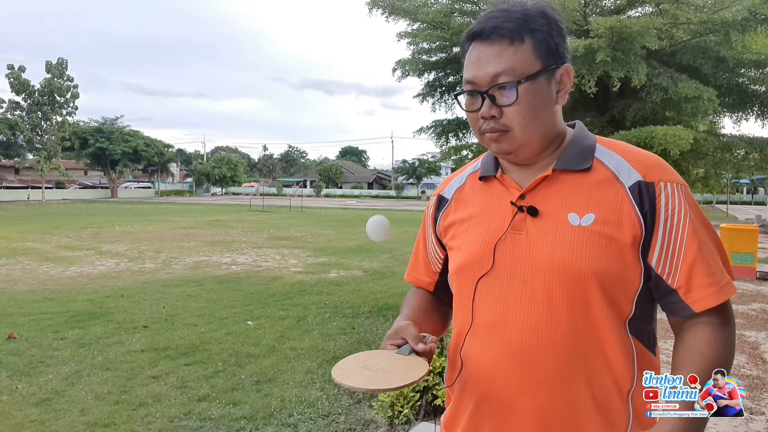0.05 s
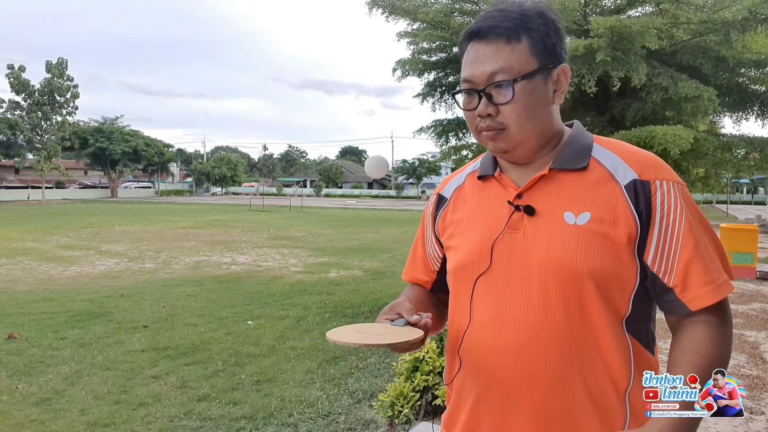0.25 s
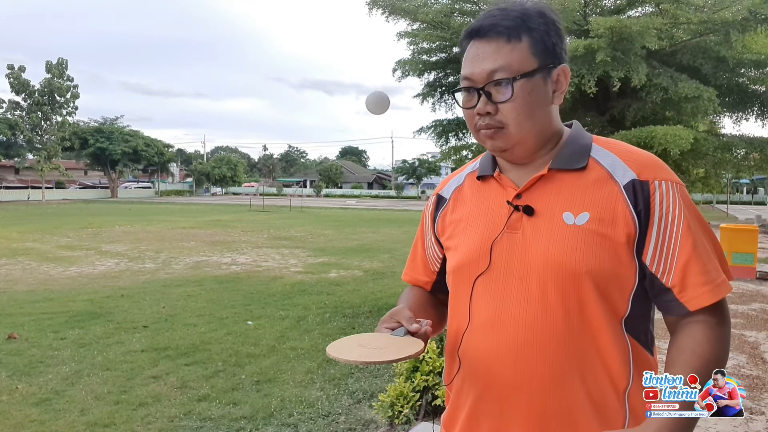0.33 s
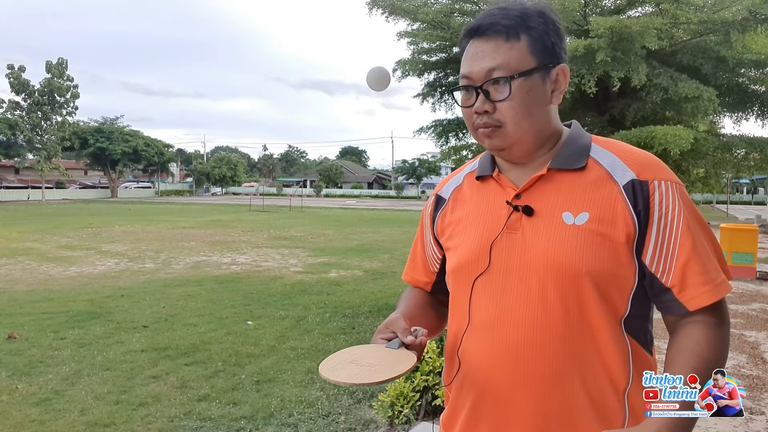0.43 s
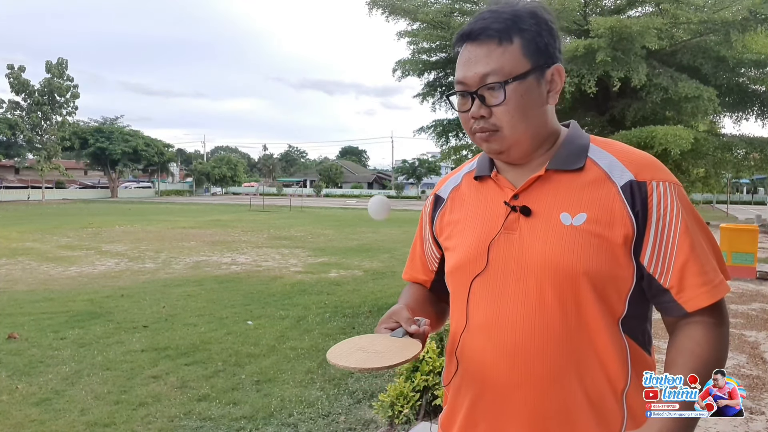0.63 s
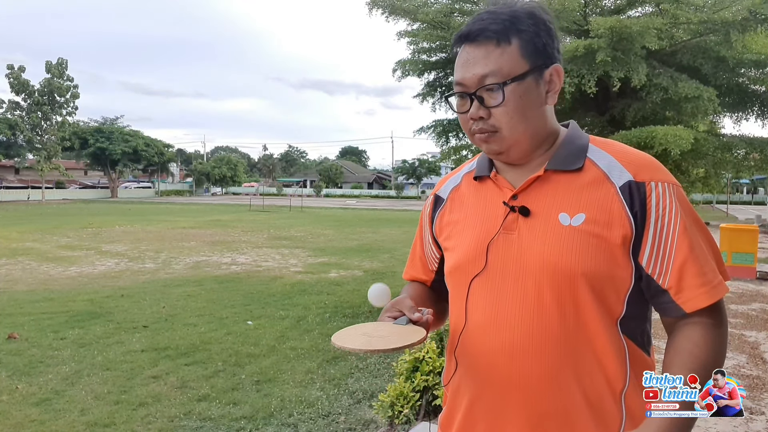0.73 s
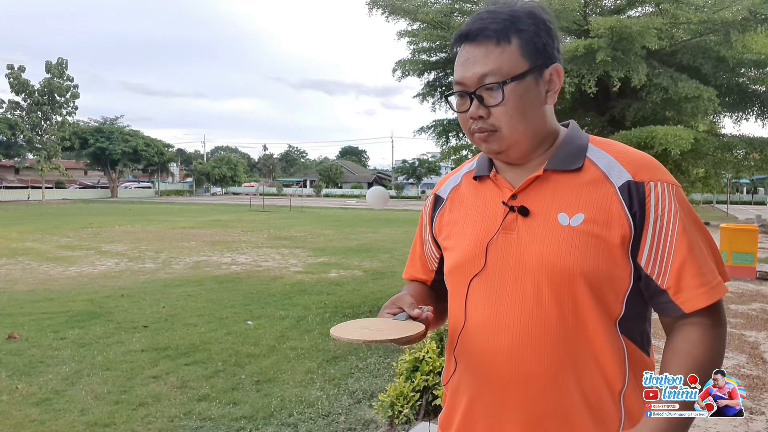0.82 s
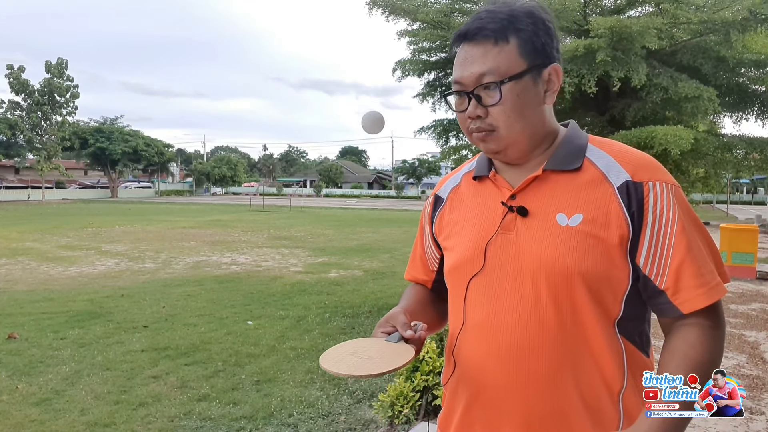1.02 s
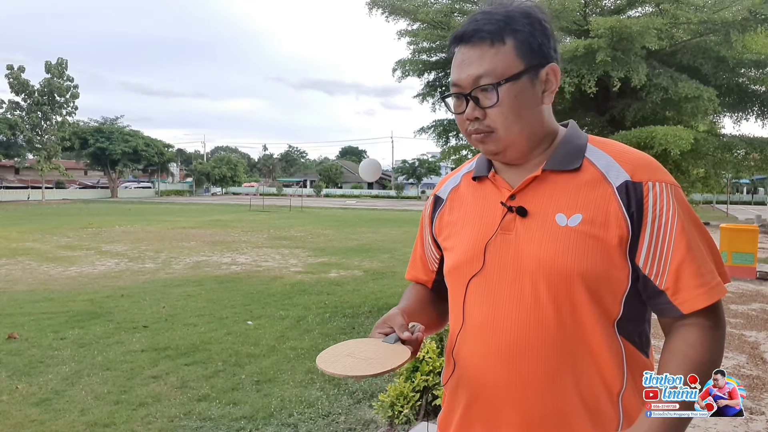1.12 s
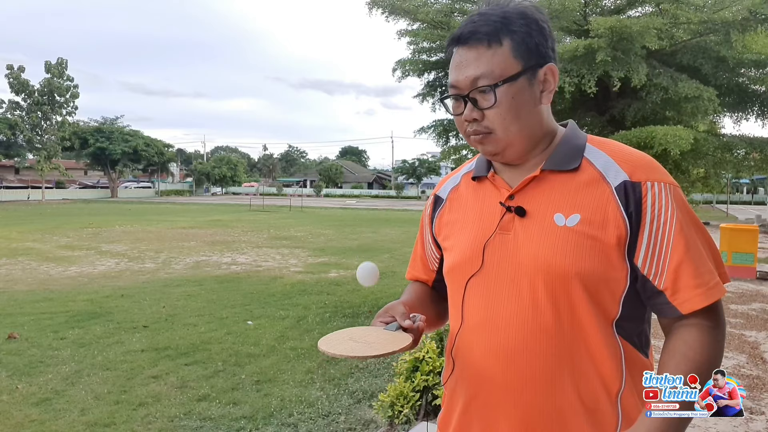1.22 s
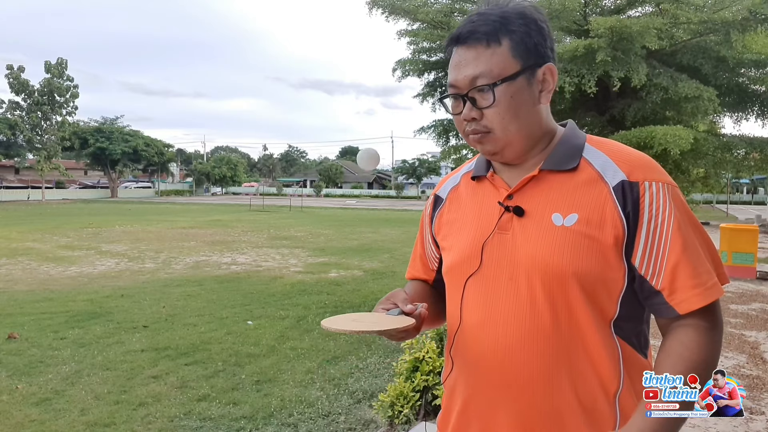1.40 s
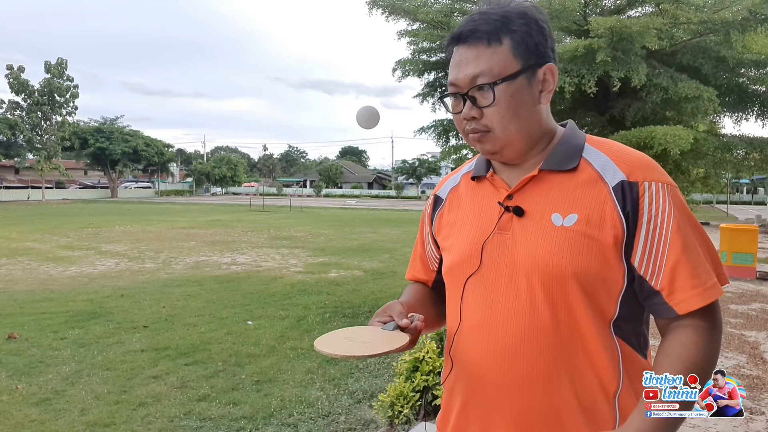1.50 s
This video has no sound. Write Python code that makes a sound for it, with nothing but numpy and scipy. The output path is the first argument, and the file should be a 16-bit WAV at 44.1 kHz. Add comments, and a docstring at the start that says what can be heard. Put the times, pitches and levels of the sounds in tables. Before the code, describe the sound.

Three bright, hollow taps ring out about half a second apart as a table tennis ball bounces on a wooden paddle. The microphone is close, outdoors, with slight echoes and a faint rumble of faraway traffic.

```python
"""Table tennis ball on a paddle

A ball bounces three times on a wooden paddle at the edge of a lawn, close to a clip-on microphone.
Each bounce rings the blade and the ball's thin shell and briefly overloads the microphone.
Walls and trees return echoes and a scattered tail, over a faint high call and distant traffic."""
import sys
import numpy as np
from scipy import signal
from scipy.fft import rfft, irfft
from scipy.io import wavfile

SR = 44100
rng = np.random.default_rng(int(sys.argv[2]) if len(sys.argv) > 2 else 0)


def generate_wav(sig):
    """Save sig (samples, or channels by samples) to the path in sys.argv[1] as 16-bit PCM at SR."""
    pcm = np.round(np.clip(np.atleast_2d(sig).T, -1, 1) * 32767).astype(np.int16)
    wavfile.write(sys.argv[1], SR, pcm)


N = 68355
TIME = np.arange(N) / SR

# ball on paddle: t/s, level/dB, blade f/Hz, blade t60/s, off-centre/dB, handle/dB, ball shell/dB
BOUNCES = [(0.2044, 2.5, 1372, 0.037, -27, -57, -2), (0.7916, 6, 1351, 0.026, -40, -39.5, -3),
           (1.328, 4.5, 1362, 0.028, -37, -39, -1.5)]


def from_db(db):
    """Decibels to gain."""
    return 10 ** (np.asarray(db) / 20)


def delayed(x, seconds):
    """The same sound, later."""
    return np.concatenate([np.zeros(int(seconds * SR)), x])[:N]


def decay(t60):
    """An envelope that loses 60 dB in t60 seconds."""
    return np.exp(-np.minimum(np.log(1000) * TIME / t60, 50))


def ring(hz, t60):
    """A struck mode: a dying sine."""
    return np.sin(2 * np.pi * hz * TIME) * decay(t60)


def shaped_noise(gain_at):
    """Noise of rms 1 whose spectrum follows gain_at(Hz)."""
    hz = np.arange(N // 2 + 1) * SR / N
    noise = irfft(rfft(rng.standard_normal(N)) * gain_at(hz), N)
    return noise / np.sqrt(np.mean(noise ** 2) + 1e-20)


def noise_band(centre_hz, half_width_hz):
    """A bell-shaped band of noise, rms 1."""
    return shaped_noise(lambda hz: np.exp(-((hz - centre_hz) / half_width_hz) ** 2))


def blade(hz, t60):
    """The main bending mode builds up under the ball, starting sharp and settling as the ball leaves."""
    sharp_share, contact_s, attack_s = 0.36, 0.0011, 0.00032
    cycles = hz * (TIME + sharp_share * contact_s * (1 - np.exp(-TIME / contact_s)))
    attack = 1 - np.exp(-TIME / attack_s)
    return np.sin(2 * np.pi * cycles) * decay(t60) * attack


def bounces():
    """Each bounce strikes the blade, the handle, the paddle's other modes and the ball's shell."""
    # weaker modes of the paddle: f/Hz, level/dB, t60/s
    paddle_modes = [(605, -20.5, 0.012), (1050, -68, 0.038), (1690, -18.5, .018), (1900, -18.5, 0.019),
                    (3183, -8.5, 0.0043), (716, -22, 0.012)]
    # modes woken by striking off centre: f/Hz, level/dB, t60/s
    off_centre_modes = [(2932, -1, 0.032), (3945, -7, 0.025), (1040, -4.5, 0.047)]
    # bright modes of the ball's thin shell: f/Hz, level/dB, t60/s
    shell_modes = [(4860, -13.5, 0.018), (5200, -32.5, 0.015), (6540, -25, 0.0084), (8160, -15, 0.0094),
                   (9910, -14.5, 0.0099), (11300, -43.5, .008), (11280, -24, .008), (12000, -27, 0.014),
                   (14600, -41, .01)]
    out = np.zeros(N)
    for start_s, db, blade_hz, blade_t60, off_centre_db, handle_db, shell_db in BOUNCES:
        handle = from_db(handle_db) * ring(hz=397, t60=0.08)
        hit = blade(blade_hz, blade_t60) + handle
        groups = (paddle_modes, 0), (off_centre_modes, off_centre_db), (shell_modes, shell_db)
        for modes, group_db in groups:
            for hz, mode_db, t60 in modes:
                hit += from_db(group_db + mode_db + rng.normal(0, 1)) * ring(hz, t60)
        out += from_db(db) * delayed(hit, start_s)
    return out


def echoes(direct):
    """Single reflections from walls and trunks carry mostly the blade's ring."""
    # reflections: delay/s, level/dB
    taps = [(0.0123, -21), (.019, -16), (.026, -23.5), (.034, -31.5), (.049, -27.5), (.058, -37),
            (.064, -33), (.069, -33), (.083, -67), (.093, -63), (.141, -50), (.190, -39.5), (.232, -46)]
    centre_hz, width_octaves = 1403, 0.35
    edges_hz = centre_hz * 2 ** (np.array([-0.5, 0.5]) * width_octaves)
    blade_band = signal.sosfilt(signal.butter(3, edges_hz, "band", fs=SR, output="sos"), direct + 1e-18)
    return sum(from_db(db) * delayed(blade_band, delay_s) for delay_s, db in taps)


def scattered_tail():
    """Trees and ground smear each bounce's ring into dying bands of noise."""
    # bands of the tail: f/Hz, half width/Hz, level/dB, t60/s
    bands = [(864, 460, -49.5, 0.66), (1407, 78, -33.5, 0.61), (1697, 230, -35, 0.34),
             (2030, 270, -42, 0.28), (2810, 880, -48, 0.31), (4750, 290, -50.5, 0.51),
             (5200, 260, -59.5, .42), (6770, 560, -59.5, .5), (8270, 360, -50.5, 0.54),
             (9800, 520, -53, .42), (10310, 350, -59, 0.51), (11530, 450, -60, 0.42),
             (13170, 600, -68, .36), (15000, 400, -77, .33), (8040, 3200, -60, 0.392)]
    predelay_s, rise_s = 0.004, 0.0041
    out = np.zeros(N)
    for centre_hz, half_width_hz, db, t60 in bands:
        swell = decay(t60) * (1 - np.exp(-TIME / rise_s))
        envelope = sum(delayed(swell, start_s + predelay_s) for start_s, *_ in BOUNCES)
        out += from_db(db) * envelope * noise_band(centre_hz, half_width_hz)
    return out


def traffic():
    """A steady bed of distant traffic rumble and faint open-air hiss."""
    # spectrum of the bed: f/Hz, relative level/dB
    spectrum = [(20, -23), (35, -23), (55, 0), (110, -3), (190, -6), (300, -19.5), (400, -20), (600, -23),
                (1200, -22.5), (2000, -28), (4500, -38.5), (7000, -46), (11000, -52.5), (15500, -49.5)]
    points_hz, points_db = np.array(spectrum).T

    def gain_at(hz):
        return from_db(np.interp(np.log(np.maximum(hz, 1)), np.log(points_hz), points_db))

    return from_db(-48.5) * shaped_noise(gain_at)


def engine_drone():
    """A far engine hums; each partial is a band of noise so narrow that it wavers."""
    # partials of the drone: f/Hz, level/dB
    partials = [(53.5, -53), (107, -55.5), (182, -62.5), (217, -68)]
    half_width_hz = 4.6
    out = np.zeros(N)
    for centre_hz, db in partials:
        out += from_db(db) * shaped_noise(lambda hz: 1 / (1 + ((hz - centre_hz) / half_width_hz) ** 2))
    return out


def far_call():
    """A thin, faint call from the trees swells and fades once."""
    peak_s, half_length_s = 1.06, 0.071
    swell = np.exp(-((TIME - peak_s) / half_length_s) ** 2)
    return from_db(-75) * noise_band(centre_hz=5900, half_width_hz=260) * swell


def scene():
    """Close bounces, their reflections and the outdoor background, in mono."""
    direct = bounces()
    return (direct + echoes(direct) + scattered_tail() + traffic() + engine_drone() + far_call())[None]


def limiter(x):
    """A fast limiter holds down the first milliseconds of each bounce."""
    threshold_db, share_removed = -3.5, 0.77
    attack_s, release_db_per_s = 0.0008, 2521
    excess_db = np.maximum(20 * np.log10(np.abs(x) + 1e-9) - threshold_db, 0)
    release_db = release_db_per_s * TIME
    held_db = np.maximum.accumulate(excess_db + release_db, axis=-1) - release_db
    pole = np.exp(-1 / (attack_s * SR))
    smoothed_db = signal.lfilter([1 - pole], [1, -pole], held_db)
    return x * from_db(-share_removed * smoothed_db)


def record(dry):
    clip_ceiling, mic_band_hz, stopband_hz = 0.73, [35, 12500], 16600
    limited = limiter(dry)
    clipped = limited / (1 + (limited / clip_ceiling) ** 4) ** (1 / 4)
    coloured = signal.sosfilt(signal.butter(2, mic_band_hz, "band", fs=SR, output="sos"), clipped)
    return signal.sosfilt(signal.cheby2(12, 70, stopband_hz, fs=SR, output="sos"), coloured)


dry = scene()
out = record(dry)
generate_wav(out)
```